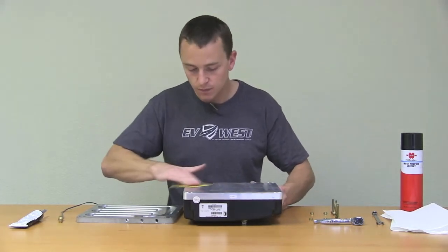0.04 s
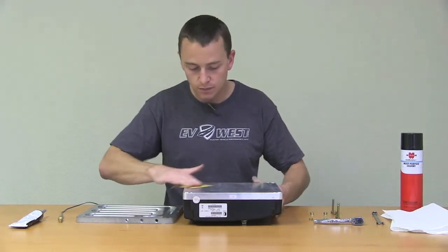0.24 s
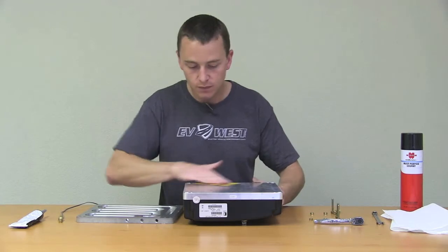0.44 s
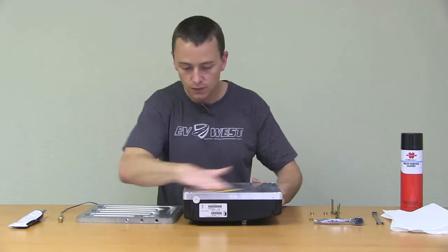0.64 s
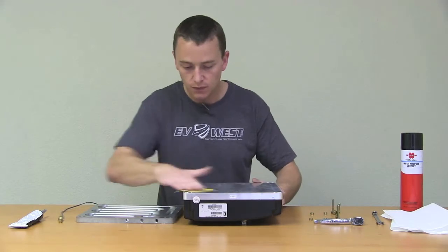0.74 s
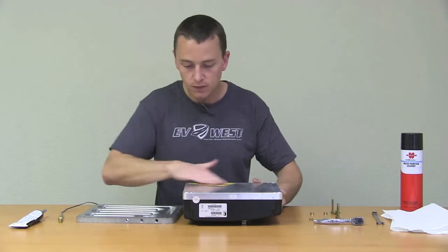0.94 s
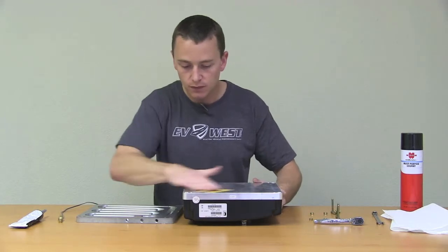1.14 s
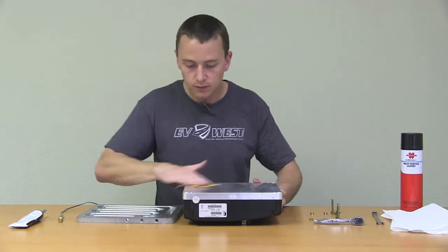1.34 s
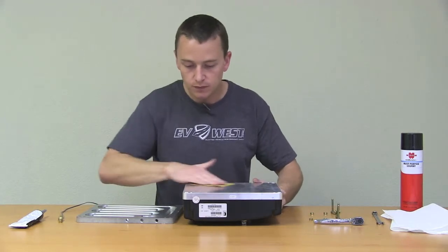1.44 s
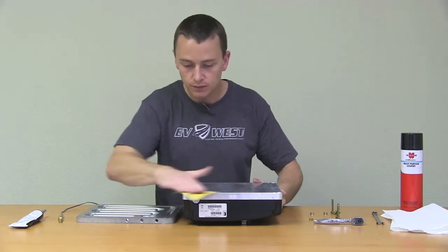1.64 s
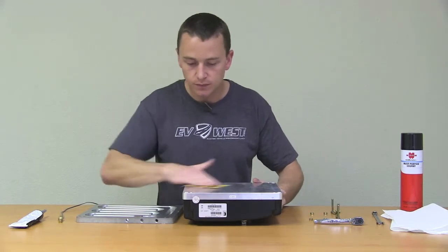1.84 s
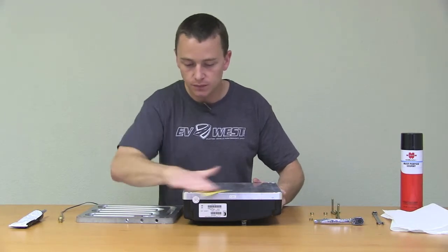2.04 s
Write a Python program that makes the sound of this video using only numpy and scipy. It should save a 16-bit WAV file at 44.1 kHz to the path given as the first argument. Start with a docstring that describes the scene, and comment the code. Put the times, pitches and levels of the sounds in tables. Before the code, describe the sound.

Close, gritty hand sanding on a metal lid at a workbench in a small room. Near the start something hard clatters in quickening bounces, then the scraping continues, harsher on each push, with soft pats underneath.

```python
"""A close, gritty hiss: sandpaper rubbed by hand to and fro over a flat metal housing on a workbench. Almost at
once a hard object knocks and rocks to rest in ever quicker bounces that ring in the small room. The grit hisses
throughout, bites harder on each push and sings in gliding bands as the hand slides back. Underneath, soft boxy
pats come and go and the housing bumps softly over a faint, low room tone."""
import sys
import numpy as np
from scipy import signal
from scipy.fft import rfft, irfft
from scipy.io import wavfile
from scipy.ndimage import uniform_filter1d, map_coordinates

SR = 44100
rng = np.random.default_rng(int(sys.argv[2]) if len(sys.argv) > 2 else 0)


def log_audio(samples):
    """Write samples as a 16-bit WAV file to the path given in sys.argv[1]."""
    # one column per channel
    frames = np.atleast_2d(samples).T
    # limit to full scale, then quantise
    limited = np.clip(frames, -1, 1)
    pcm = np.round(limited * 32767).astype(np.int16)
    wavfile.write(sys.argv[1], SR, pcm)


N = 92610


def undb(db):
    """Decibels to gain."""
    return 10 ** (np.asarray(db) / 20)


def unit(x):
    """Scale to rms 1."""
    return x / np.sqrt(np.mean(x ** 2))


def noise():
    """White noise."""
    return rng.standard_normal(N)


def colour(x, points):
    """EQ a signal along (f/Hz, level/dB) points, then scale to rms 1."""
    hz, db = np.array(points, float).T
    f = np.maximum(np.fft.rfftfreq(N, 1 / SR), 1)
    return unit(irfft(rfft(x) * undb(np.interp(np.log(f), np.log(hz), db)), N))


def wander(rate_hz):
    """Smooth random modulation at rms 1."""
    step = max(int(SR / rate_hz), 1)
    return unit(uniform_filter1d(np.repeat(noise()[:N // step + 1], step), step)[:N])


def swell(t, at, rise, fall):
    """A rounded rise to 1 and a rounded fall."""
    return np.exp(-.5 * ((t - at) / np.where(t < at, rise, fall)) ** 2)


def fade(t, t60):
    """A decay of 60 dB in t60 seconds."""
    return np.exp(-np.log(1000) * t / t60)


def band(hz, width_hz):
    """Noise in a resonance whose centre may glide."""
    lowpass = signal.butter(2, min(width_hz / 2, SR / 4), fs=SR, output="sos")
    slow = signal.sosfilt(lowpass, noise() + 1j * noise())
    carrier = np.exp(2j * np.pi * np.cumsum(hz * np.ones(N)) / SR)
    return unit(np.real(slow * carrier))


# EQ of the centred room tone: f/Hz, level/dB
ROOM_TONE_EQ = [(20, -16.5), (45, 1.5), (220, -10), (1500, -28.5), (16000, -40)]
# EQ of the rumble at the sides: f/Hz, level/dB
RUMBLE_EQ = [(30, 6), (1400, -22.5), (3000, -53)]


def room_tone():
    """A faint, dark bed of noise, as mid and side."""
    return undb(-65) * colour(noise(), ROOM_TONE_EQ), undb(-70) * colour(noise(), RUMBLE_EQ)


# Soft, boxy pats: t/s, level/dB
SOFT_PATS = [(0.036, -52.5), (0.077, -52.5), (0.122, -55), (.2, -51.5), (0.817, -53), (0.908, -55),
             (1.029, -55.5), (1.146, -61), (1.524, -54), (1.693, -52), (1.894, -56), (1.978, -58.5)]
# Boxy EQ of a pat: f/Hz, level/dB
PAT_EQ = [(380, -11), (560, 6.5), (1050, -4.5), (1350, 1.5), (2300, -18.5)]
# Bumps of the housing: t/s, level/dB
HOUSING_BUMPS = [(1.257, -53), (1.789, -48.5)]
# Dull EQ of a bump: f/Hz, level/dB
BUMP_EQ = [(130, -4), (600, -11), (2000, -24.5)]


def handling(t):
    """Soft pats come and go and the housing bumps softly under the hand."""
    pats = sum(undb(db) * swell(t, at + .0022, rise=.0022, fall=.018) for at, db in SOFT_PATS)
    bumps = sum(undb(db) * swell(t, at, rise=.0064, fall=.028) for at, db in HOUSING_BUMPS)
    return pats * colour(noise(), PAT_EQ) + bumps * colour(noise(), BUMP_EQ)


# EQ of the small room's reverb: f/Hz, level/dB
REVERB_EQ = [(60, -36), (250, -8), (550, -2), (1700, 0.5), (3000, 4.5), (3700, -2), (5000, 3.5), (7000, -7),
             (10000, -42)]


def room_tail(t):
    """The room answers a knock, its lows outlasting its highs."""
    air = colour(noise(), REVERB_EQ)
    low = signal.sosfiltfilt(signal.butter(2, 2540, fs=SR, output="sos"), air)
    return undb(-27) * (low * fade(t, t60=.61) + (air - low) * fade(t, t60=.27))


# EQ of the knocked bench: f/Hz, level/dB
BENCH_EQ = [(80, -9), (200, -18.5), (600, 0.5), (1500, 1.5), (10000, -28.5)]


def bench_thud(t):
    """The bench gives a knock its short, dry body."""
    return undb(-24.5) * colour(noise(), BENCH_EQ) * fade(t, t60=.094)


# Partials of the knocked metal: f/Hz, level/dB
METAL_MODES = [(341, -42.5), (532, -40), (1034, -37.5), (1190, -39.5), (1233, -36.5), (1722, -38.5),
               (1997, -36.5), (2283, -33), (2750, -40), (2913, -38), (3021, -34), (3538, -39),
               (4028, -37.5)]


def metal_ring(t):
    """Struck metal rings in inharmonic partials that die away together."""
    partials = sum(undb(db) * np.sin(2 * np.pi * (hz * t + rng.random())) for hz, db in METAL_MODES)
    return partials * fade(t, t60=.27)


# EQ of hard contact, for crack and chatter: f/Hz, level/dB
CONTACT_EQ = [(100, -18), (1200, -6), (2600, -4), (3050, 6), (3700, -9.5), (4100, -0.5), (5200, -14.5),
              (6500, -14.5), (16000, -46)]


def crack(t, at):
    """Hard contact snaps out a few milliseconds of noise, at rms 1 where it peaks."""
    shape = swell(t, at, rise=.0017, fall=.0017)
    return unit(shape * colour(noise(), CONTACT_EQ)) * np.sqrt(np.mean(shape ** 2))


def chatter(clicks_per_s):
    """Loose contact rattles in random clicks."""
    clicks = (rng.random(N) < clicks_per_s / SR) * np.sign(noise())
    return colour(clicks, CONTACT_EQ)


# Bounces of the rocking object: t/s, level/dB relative to the first
BOUNCES = [(0.2355, 0), (0.3297, -2), (0.4022, -6), (0.4585, -10), (0.517, -16), (0.559, -20),
           (.592, -23.5), (0.613, -27), (.631, -29)]


def rocking_object(t, attack_s=.0028):
    """Each bounce ticks, cracks and chatters, sets off metal, bench and room, and feeds a thin ping."""
    blows = np.zeros(N)
    for at, db in BOUNCES:
        blows[int(at * SR)] += undb(db)
    struck = lambda response: signal.fftconvolve(blows, response)[:N]
    # overlapping envelopes add in power
    follow = lambda shape: np.sqrt(np.abs(signal.fftconvolve(blows ** 2, shape ** 2)[:N]))
    ticks = undb(-21) * band(5100, width_hz=2000) * struck(swell(t, .00064, rise=.00032, fall=.00047))
    cracks = sum(undb(db - 16.5) * crack(t, at + attack_s) for at, db in BOUNCES)
    rattle = undb(-31.5) * chatter(clicks_per_s=670) * follow(swell(t, .021, rise=.0105, fall=.022))
    body = (room_tail(t) + bench_thud(t) + metal_ring(t)) * np.minimum(t / attack_s, 1)
    ping = undb(-46) * follow(fade(t, t60=.4)) * np.sin(2 * np.pi * 8500 * t)
    return ticks + cracks + rattle + ping + struck(body)


def judder():
    """The hand judders: a fast, shallow flutter in gain."""
    return undb(1.11 * wander(rate_hz=113.2))


# Singing glides of the sheet: middle t/s, length/s, start f/Hz, end f/Hz, level/dB, width/start pitch
GLIDES = [(0.083, 0.092, 3960, 4295, -48, 0.22), (0.218, 0.09, 4150, 4210, -44.5, 0.26),
          (0.914, 0.054, 5510, 6270, -42.5, 0.51), (1.089, 0.061, 3640, 3710, -55, 0.13),
          (1.118, 0.072, 2520, 2360, -56.5, 0.061), (1.093, 0.05, 8180, 8330, -44, 0.051),
          (1.106, 0.04, 6580, 6380, -48, 0.051), (1.265, 0.029, 6280, 6080, -46.5, 0.055),
          (1.489, 0.06, 2000, 2650, -60, 0.22), (1.554, 0.048, 3336, 4170, -47, 0.075),
          (1.606, 0.039, 5980, 6380, -52, .15), (1.384, .023, 5800, 7170, -44, 0.4),
          (1.955, 0.027, 2490, 2770, -52.5, 0.039)]


def singing(t):
    """The sliding sheet sings in short, raspy, gliding bands."""
    out = np.zeros(N)
    for at, length, start_hz, end_hz, db, width in GLIDES:
        hz = np.interp(t, [at - length / 2, at + length / 2], [start_hz, end_hz])
        voice = unit(band(hz, width * start_hz) * judder())
        out += undb(db) * swell(t, at, length / 3, length / 3) * voice
    return out


# Snags of single grits: t/s, f/Hz, level/dB
SNAGS = [(0.071, 3994, -33), (0.2309, 3074, -22.5), (0.319, 4900, -28), (0.894, 6630, -35),
         (1.099, 7000, -38), (1.106, 8030, -38.5), (1.1195, 6450, -40), (1.299, 7500, -36.5),
         (1.73, 4650, -39), (1.69, 2890, -41.5), (1.825, 2810, -41)]


def catching(t):
    """Single grits catch, each with a sharp, pitched tick."""
    return sum(undb(db) * swell(t, at, .001, .001) * band(hz, .34 * hz) for at, hz, db in SNAGS)


def grit(spread_db, grains_per_s=11000):
    """Dense tiny clicks of uneven size, juddering with the hand."""
    hits = rng.random(N) < grains_per_s / SR
    size = undb(spread_db * np.minimum(rng.exponential(size=N), 6))
    return hits * size * np.sign(noise()) * judder()


def rasp(x, depth_db=2):
    """The shifting contact lets neighbouring bands of the hiss swell and sink on their own."""
    spectrum, out = rfft(x), 0
    hz = np.maximum(np.fft.rfftfreq(N, 1 / SR), 1)
    place = np.clip(5 * np.log2(hz / 6360), -7, 4)  # five bands to the octave
    for k in range(-7, 5):
        strip = irfft(spectrum * np.maximum(1 - abs(place - k), 0), N)
        out += strip * undb(depth_db * wander(rate_hz=39))
    return unit(out)


# Comb sweeps under the returning hand: middle t/s, length/s, start spacing/Hz, end spacing/Hz
COMB_SWEEPS = [(1.1, 0.055, 3820, 3670), (1.528, 0.066, 2880, 4040), (1.984, 0.032, 3540, 3980)]


def hollow(x, t):
    """The gap under the sliding hand echoes the hiss: a comb filter that glides with its size."""
    for at, length, start_hz, end_hz in COMB_SWEEPS:
        hz = np.interp(t, [at - length / 2, at + length / 2], [start_hz, end_hz])
        wet = .49 * swell(t, at, length / 2, length / 2)
        echo = map_coordinates(x, [(t - 1 / hz) * SR], mode="mirror")
        x = (x + wet * echo) / np.sqrt(1 + wet ** 2)
    return x


# Fader ride of the sliding hiss: t/s, level/dB
HISS_RIDE = [(0, -37), (.03, -47.5), (.06, -44.5), (.115, -46.5), (.14, -66), (.16, -47), (.22, -40.5),
             (.305, -50), (.34, -44.5), (.39, -43.5), (.48, -50.5), (.88, -47), (.97, -51.5), (1.04, -48),
             (1.07, -50), (1.22, -48.5), (1.33, -44.5), (1.45, -49), (1.61, -45.5), (1.66, -48.5),
             (1.78, -43.5), (1.88, -48), (1.98, -48), (2.03, -45.5), (2.1, -47)]
# Bright EQ of sliding grit: f/Hz, level/dB
HISS_EQ = [(100, -39), (600, -9), (1100, -16), (1900, -11), (2600, -3.5), (3100, -9), (5200, -2),
           (8200, 1.5), (10000, -4.5), (16000, -23.5)]
# Pushes that dig the grit in: peak t/s, rise/s, fall/s, level/dB
BITES = [(0.755, 0.0082, 0.023, -44.5), (.81, 0.038, 0.041, -43), (1.312, 0.031, .048, -43.5),
         (1.342, 0.012, 0.013, -40.5), (1.735, 0.067, 0.017, -47), (1.792, 0.0099, 0.011, -39.5),
         (1.823, .008, 0.012, -40)]
# Harsh EQ of biting grit: f/Hz, level/dB
BITE_EQ = [(100, -56), (1600, -27), (2600, 0), (4200, 2.5), (10000, -0.5), (16000, -21.5)]


def sanding(t):
    """Grit slides with a bright, shifting hiss and bites deeper on each push."""
    slide = rasp(colour(grit(spread_db=2), HISS_EQ))
    hiss = hollow(slide, t) * undb(np.interp(t, *np.array(HISS_RIDE).T))
    effort = np.sqrt(sum((undb(db) * swell(t, at, rise, fall)) ** 2 for at, rise, fall, db in BITES))
    return hiss + effort * colour(grit(spread_db=3), BITE_EQ)


def scene():
    """All the work sits in the centre; only a faint rumble differs between the ears."""
    t = np.arange(N) / SR
    work = sanding(t) + singing(t) + catching(t) + handling(t) + rocking_object(t)
    bed, side = room_tone()
    mid = bed + work
    return np.array([mid + side, mid - side])


def record(dry):
    """Soft saturation rounds the loudest peaks and a steep low-pass cuts the top."""
    ceiling, top_hz = .36, 15800
    rounded = ceiling * np.tanh(dry / ceiling)
    return signal.sosfilt(signal.ellip(10, .2, 80, top_hz, fs=SR, output="sos"), rounded)


dry = scene()
out = record(dry)
log_audio(out)
```